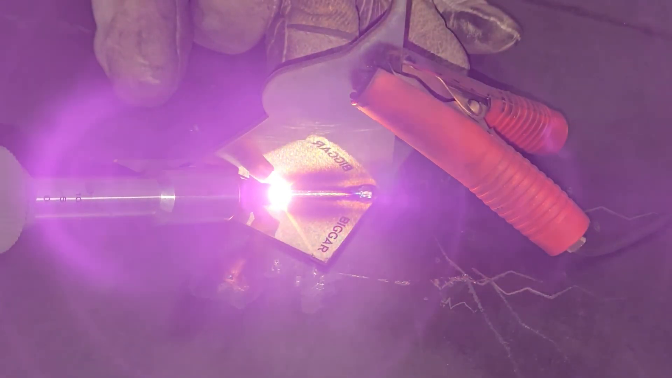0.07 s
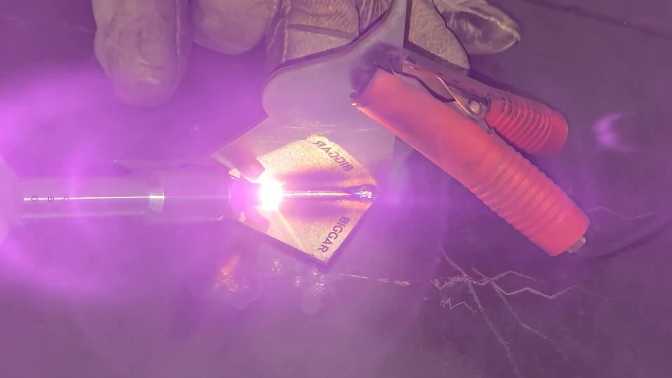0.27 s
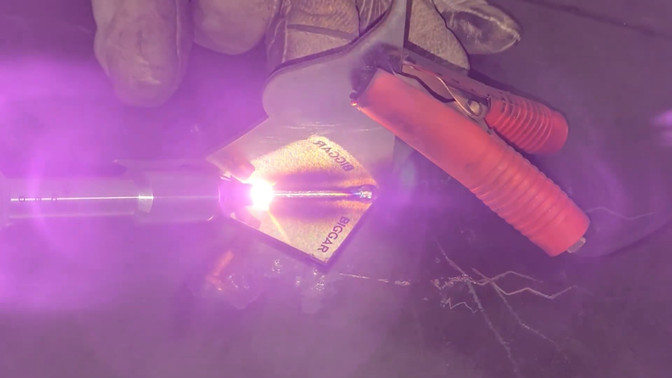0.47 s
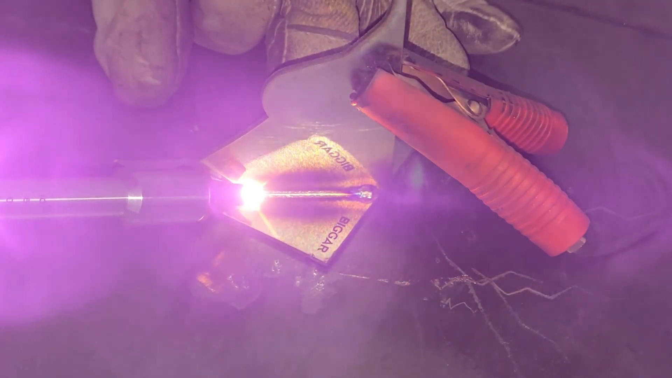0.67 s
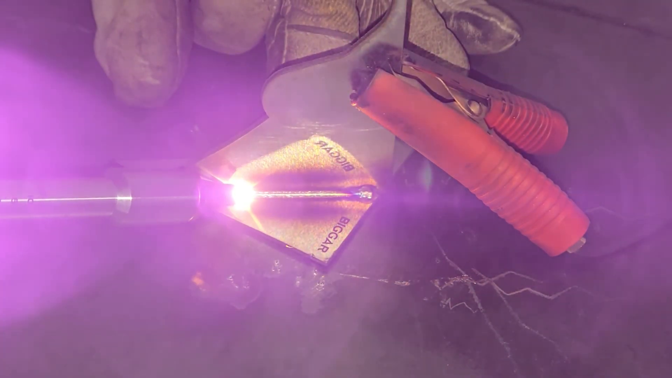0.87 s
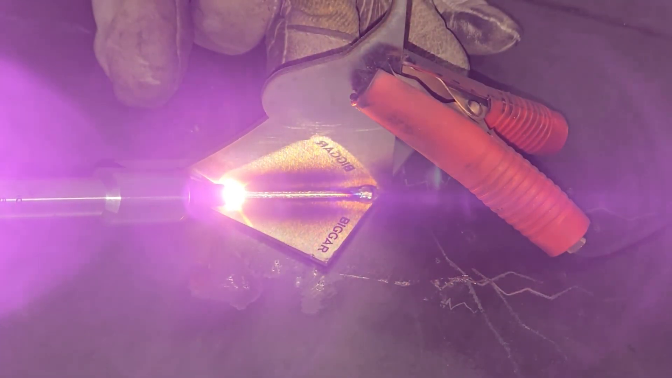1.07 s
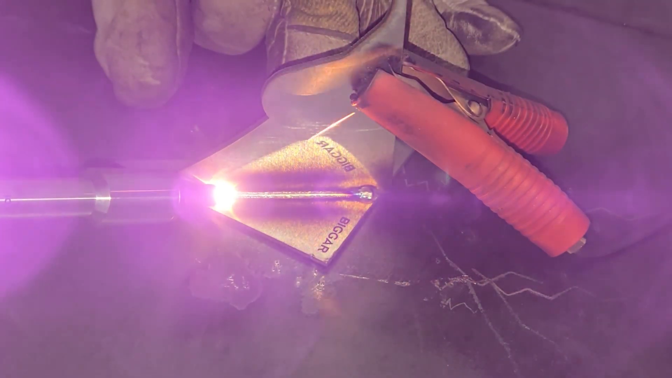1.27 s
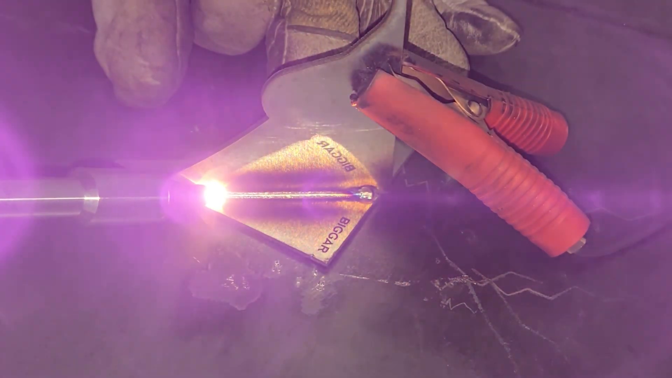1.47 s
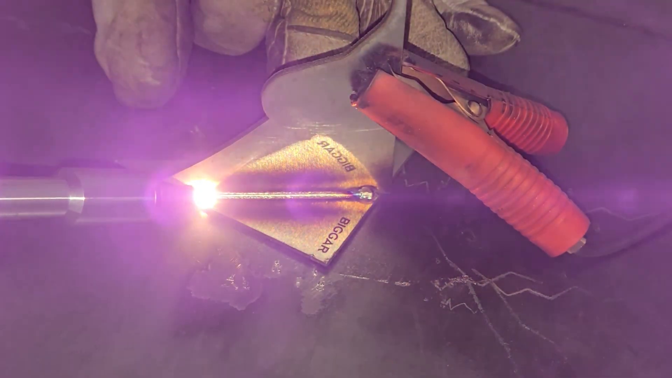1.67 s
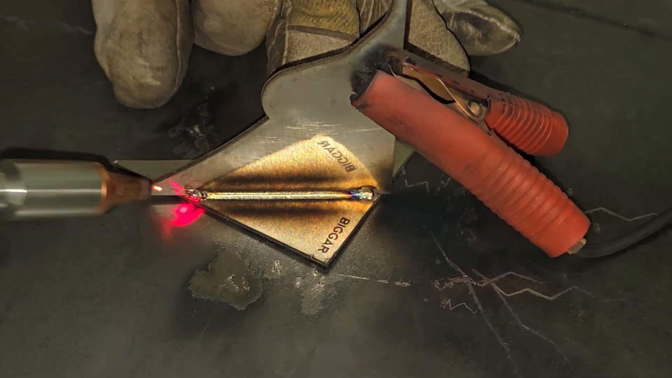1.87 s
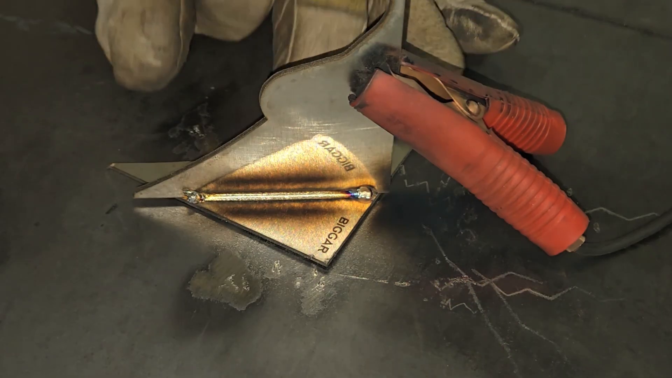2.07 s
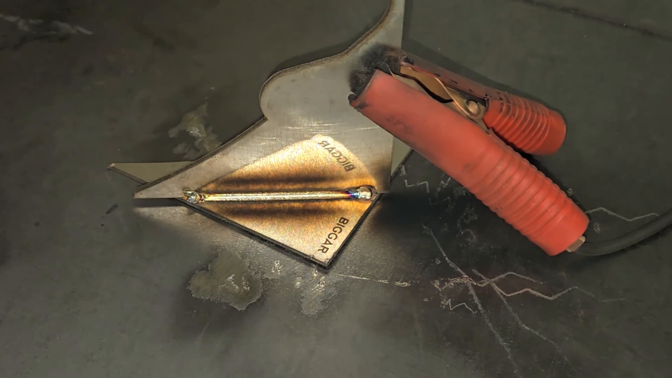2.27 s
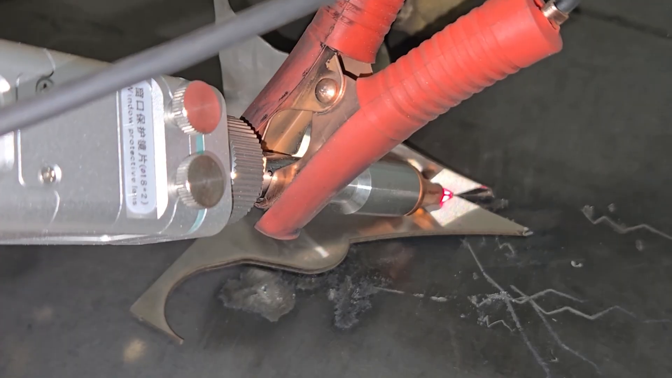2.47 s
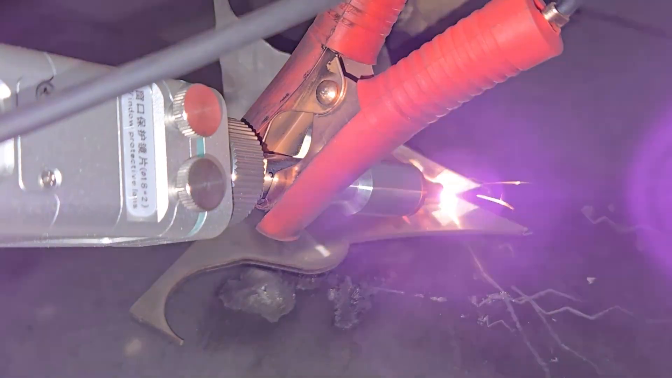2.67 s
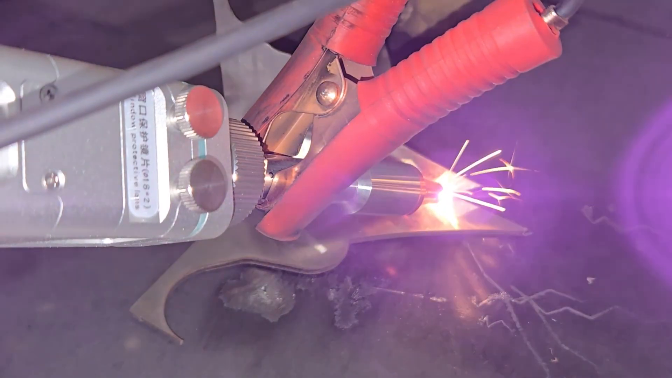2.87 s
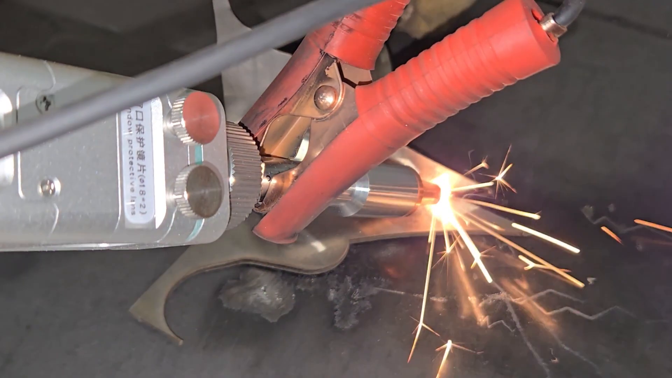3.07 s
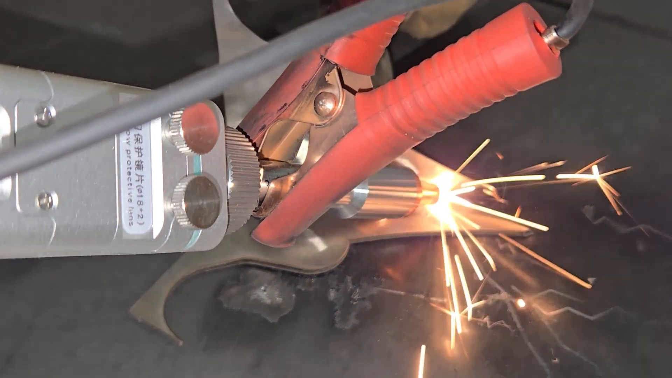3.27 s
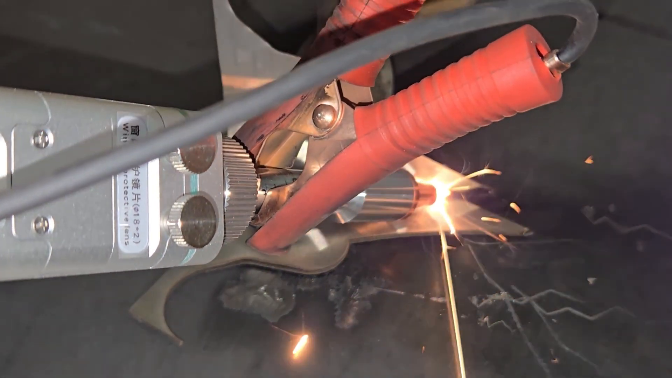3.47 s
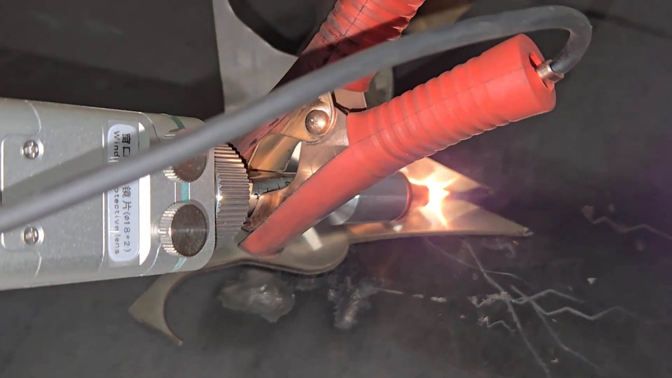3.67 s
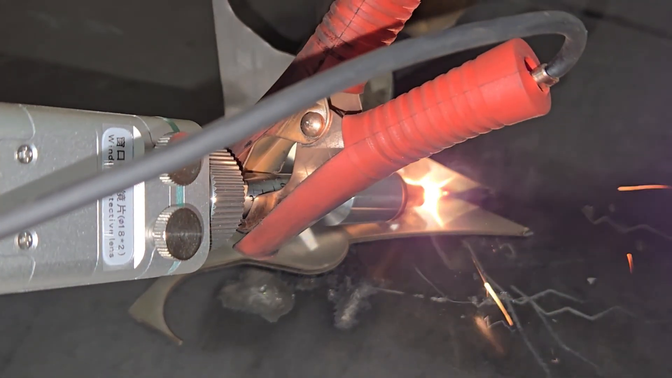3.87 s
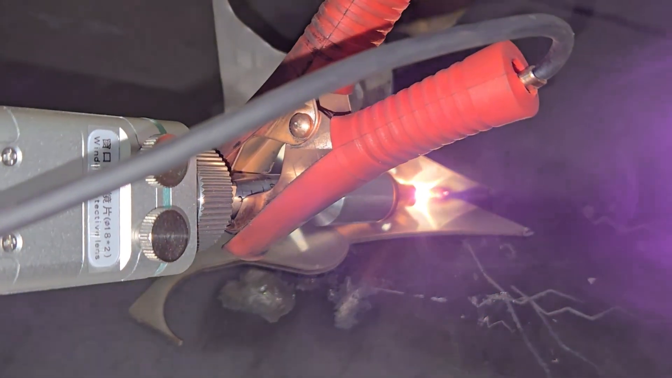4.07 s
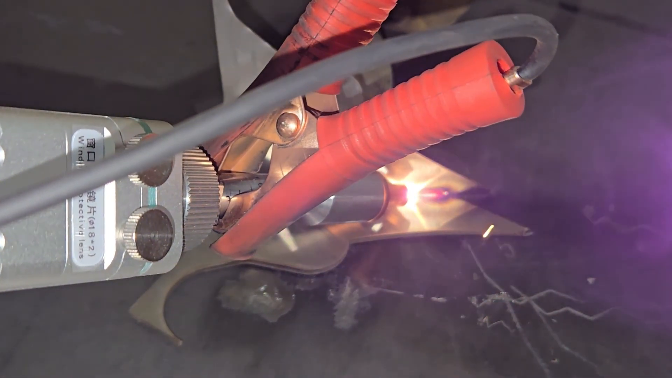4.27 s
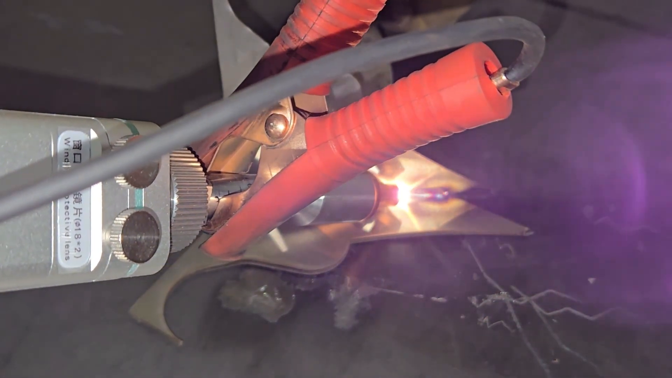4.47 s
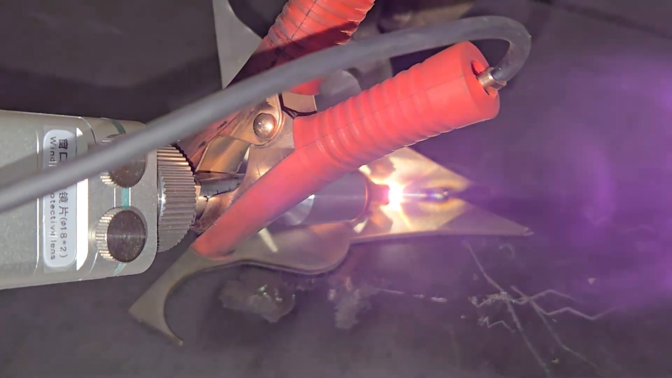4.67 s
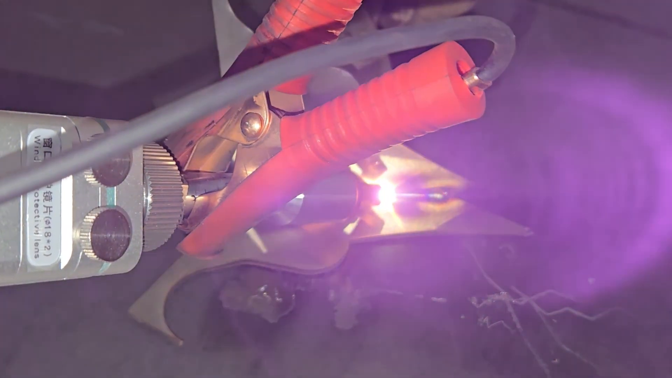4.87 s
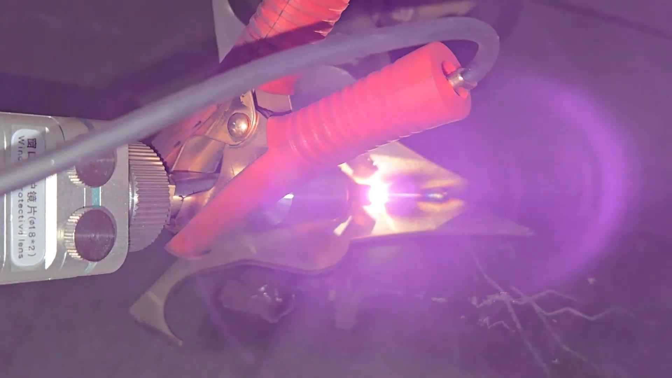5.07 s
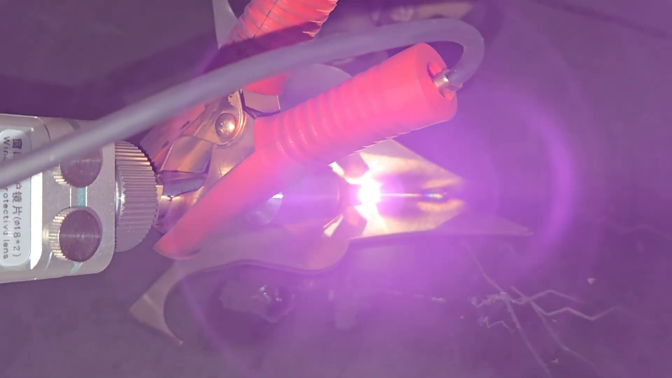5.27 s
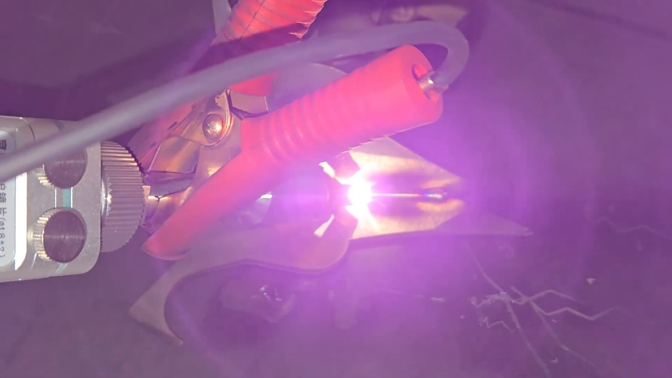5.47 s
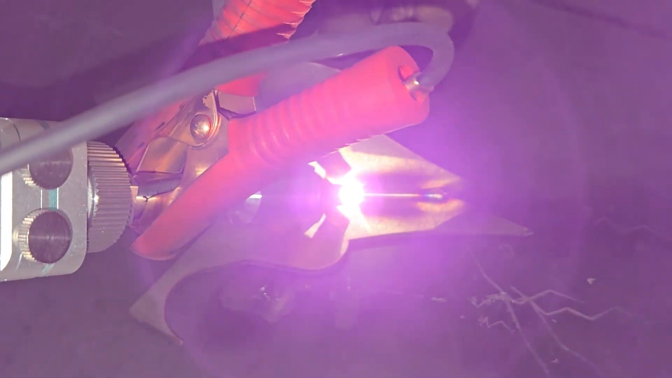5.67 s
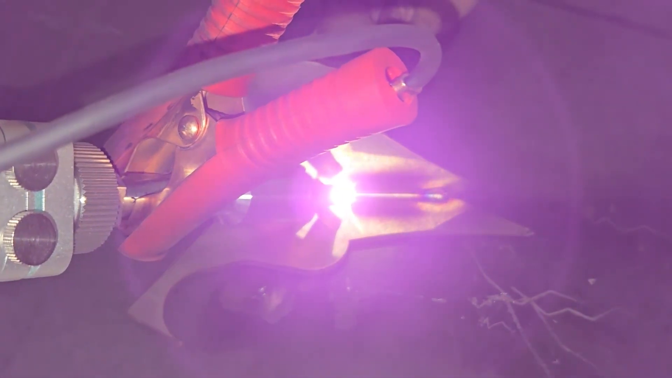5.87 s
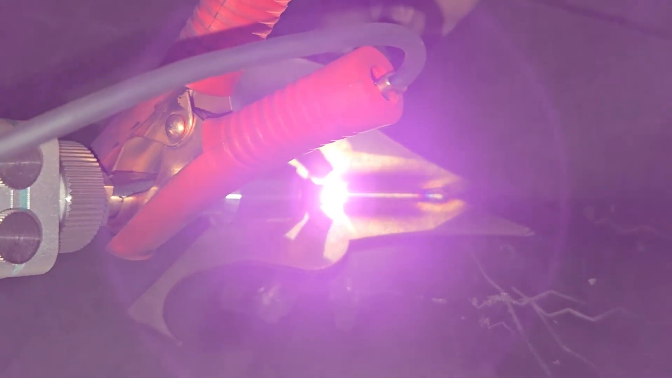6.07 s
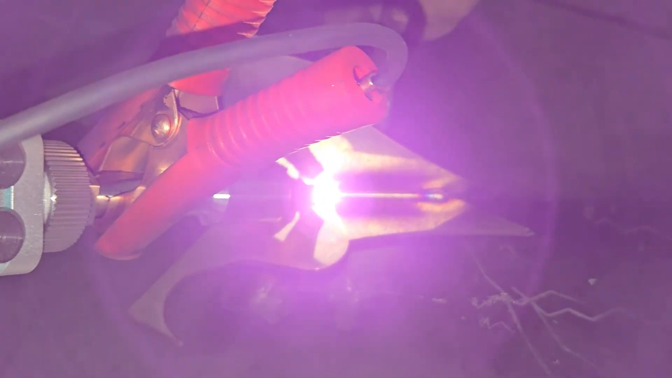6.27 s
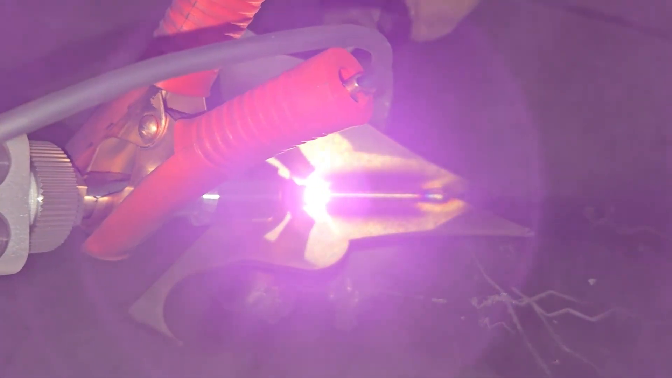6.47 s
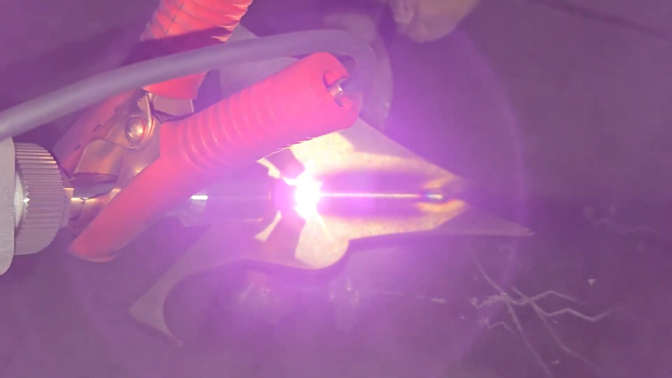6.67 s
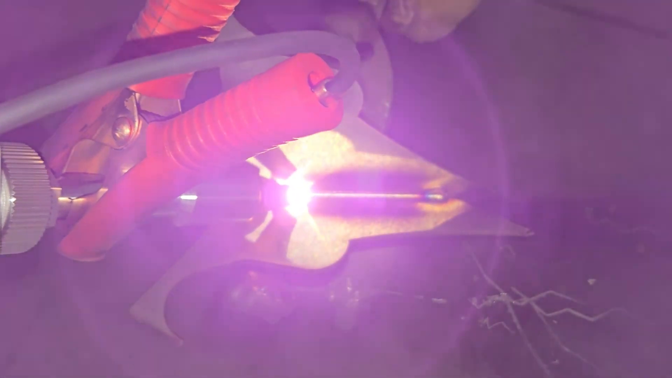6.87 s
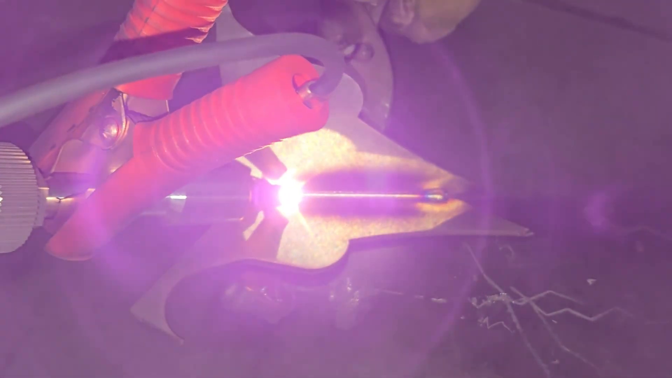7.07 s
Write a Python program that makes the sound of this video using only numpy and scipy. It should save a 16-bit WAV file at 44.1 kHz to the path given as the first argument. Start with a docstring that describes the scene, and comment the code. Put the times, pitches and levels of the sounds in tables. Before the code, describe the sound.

A laser welder's bright buzzing fizz stops, leaving faint fan noise and soft knocks, then gas hisses and it relights, jetting steadily before buzzing again.

```python
"""A handheld laser welder on a steel bench: the first seam fizzes, sputters and buzzes from the outset.
The beam wobbles 120 times a second; each sweep boils off vapour bursts. It boils harder at the thin tip, then stops.
In the pause a fan is heard, a motor hum dies, a glove rustles and the work knocks; a valve lets gas hiss through
the nozzle. The beam relights with a flare, pierces as a growing steady jet, then throbs and runs a second seam."""
import sys
import numpy as np
from scipy import signal
from scipy.fft import rfft, irfft, next_fast_len
from scipy.io import wavfile
from scipy.ndimage import uniform_filter1d

SR = 44100
rng = np.random.default_rng(int(sys.argv[2]) if len(sys.argv) > 2 else 0)


def output_pcm(signal):
    """Save a mono or channel-first signal as 16-bit PCM at the path in sys.argv[1].

    Samples are clipped to [-1, 1] before scaling.
    """
    pcm = np.clip(np.atleast_2d(signal).T, -1, 1) * 32767
    wavfile.write(sys.argv[1], SR, np.round(pcm).astype(np.int16))


N = 313551
TIME = np.arange(N) / SR
SIZE = next_fast_len(N + SR // 2, real=True) // 2 * 2
FREQS = np.maximum(np.arange(SIZE // 2 + 1) * SR / SIZE, 1)
WOBBLE_HZ = 120.005
VALVE_S = 2.622   # also parts the first weld's settings from the second's


def from_db(db):
    """Decibels to gain."""
    return 10 ** (np.asarray(db) / 20)


def rms_one(x):
    """Scale to unit rms."""
    return x / np.sqrt(np.mean(x ** 2) + 1e-20)


def in_time(rows):
    """One curve over time per column."""
    s, *columns = np.transpose(rows)
    return [np.interp(TIME, s, c) for c in columns]


def in_frequency(rows):
    """One gain curve per dB column, interpolated over log frequency."""
    hz, *columns = np.transpose(rows)
    return [from_db(np.interp(np.log(FREQS), np.log(hz), c)) for c in columns]


def between(start, end, edge=0.0014):
    """A gate, open from start to end, with straight ramps outside."""
    opening = np.clip((TIME - start) / edge + 1, 0, 1)
    closing = np.clip((end - TIME) / edge + 1, 0, 1)
    return opening * closing


def ramp(start, length):
    """A straight rise from 0 to 1."""
    return np.clip((TIME - start) / length, 0, 1)


def swell(s, length):
    """A bell of height 1."""
    return np.exp(-np.minimum(((TIME - s) / length) ** 2, 50))


def decay(start, tau):
    """Sudden start, exponential fall."""
    return (TIME >= start) * np.exp(-np.clip((TIME - start) / tau, 0, 50))


def drift(rate):
    """Random curve of rms 1, straight between `rate` knots a second."""
    knots = np.arange(N) * rate / SR
    return rms_one(np.interp(knots, np.arange(N // 8), rng.standard_normal(N // 8)))


def high_pass(hz, order=4):
    """Gain of a Butterworth high-pass."""
    return 1 / np.sqrt(1 + (hz / FREQS) ** (2 * order))


def low_pass(hz, order=4):
    """Gain of a Butterworth low-pass; far above the cut-off its fall stops at a floor near -400 dB."""
    ratio = np.minimum(FREQS / hz, 10 ** (20 / order))   # the limit stops overflow
    return 1 / np.sqrt(1 + ratio ** (2 * order))


def colour(x, gain):
    """Causal (minimum-phase) filter with the given gain curve."""
    cepstrum = irfft(np.log(gain + 1e-5 * gain.max()))
    cepstrum[1:SIZE // 2] *= 2
    cepstrum[SIZE // 2 + 1:] = 0
    return irfft(rfft(x, SIZE) * np.exp(rfft(cepstrum)))[..., :N]


def grains(spread_db, rate):
    """Noise whose strength wanders at random."""
    return rms_one(rng.standard_normal(N) * from_db(spread_db * np.clip(drift(rate), -2, 2)))


def sweeps(bursts, between_db, uneven_db, jitter):
    """Vapour jet strength: every sweep repeats the bursts, unequal in level and jittered (cycles)."""
    power = from_db(between_db) ** 2
    for start, length, db in bursts:
        cycle = WOBBLE_HZ * TIME - start + jitter * drift(60) + 2
        sweep_db = db + uneven_db * np.clip(rng.standard_normal(N // 100), -2, 2)
        strength = from_db(sweep_db)[cycle.astype(int)]
        power = power + (strength * np.exp(-(cycle % 1) / length)) ** 2
    return rms_one(np.sqrt(uniform_filter1d(power, size=5)))


# Vapour bursts in one sweep. Each row: start in cycles, decay in cycles, level in dB.
FIRST_BURSTS = [(.008, .055, 0), (.07, .06, -6), (.205, .08, -5), (.5, .04, -3), (.6, .11, -11),
                (.725, .11, -6.5)]
SECOND_BURSTS = [(.205, .038, .7), (.3, .08, -8), (.405, .11, -8), (.703, .038, -2), (.81, .09, -10.5),
                 (.94, .1, -6)]
# Slower slops of the melt in one sweep. Each row: start in cycles, decay in cycles, level in dB.
FIRST_SLOPS = [(.14, .1, 0), (.66, .18, -2)]
SECOND_SLOPS = [(.36, .14, 0), (.88, .18, 0)]
# Fizz colour. Each row: frequency in Hz, first seam in dB, piercing in dB, second seam in dB.
FIZZ_COLOUR = [(3000, -13.5, -20, -15.5), (3930, -12.5, -15.5, -12), (5090, -10, -17.5, -13.5),
               (6550, -6, -6, -4.5), (7500, -3.5, -6.5, -5.5), (8260, -3, -5, -3), (9430, 1.5, -5, -3),
               (10020, 6, 0, 2.5), (10500, -0.2, -2, -0.5), (12000, 2, -3.5, -1.5), (12800, 1.5, 4, 3.5),
               (13800, 2.5, -0.5, 0.5), (14940, 3.5, 3, 4), (15600, -2, -5, -6.5)]
# Sputter colour. Each row: frequency in Hz, first seam in dB, second seam in dB.
SPUTTER_COLOUR = [(60, -7, -26), (131, -10.5, -13), (219, -9.5, -3), (342, -4.5, -3), (544, 1.5, 2.5),
                  (905, -2, -1.5), (1150, 0, -0.5), (2140, -3, -1), (2500, -2.5, 1), (2930, -2.5, -2)]
LULL_DB, UNEVEN_DB, JITTER_CYCLES = -21, 1.3, .003
# share of the second weld's jet power that pulses only gently (0-1)
STEADY_PIERCING, STEADY_RUNNING = 0.97, 0.15


def weld():
    """Vapour bursts gate a bright fizz, melt slops a duller sputter; while piercing the jet hardly pulses."""
    first, second = lit()
    fizz_db, sputter_db = boiling()
    steady = np.clip(STEADY_RUNNING + (STEADY_PIERCING - STEADY_RUNNING) * piercing(), 0, 1)
    phase = 2 * np.pi * WOBBLE_HZ * TIME
    gentle_jet = from_db(2.0 * np.cos(2 * phase) + 1.3 * np.sin(phase) + 1.0 * drift(250))
    jets = [sweeps(FIRST_BURSTS, LULL_DB, UNEVEN_DB, JITTER_CYCLES),
            gentle_jet,
            sweeps(SECOND_BURSTS, LULL_DB, UNEVEN_DB, JITTER_CYCLES)]
    shares = [first, second * np.sqrt(steady), second * np.sqrt(1 - steady)]
    fizz = 0
    for share, jet, gain in zip(shares, jets, in_frequency(FIZZ_COLOUR)):
        hiss = jet * grains(spread_db=1.0, rate=4000)
        fizz = fizz + share * rms_one(colour(hiss, gain * high_pass(2820)))
    # two slops a sweep, at the turns of the beam
    slops = [sweeps(FIRST_SLOPS, between_db=-9.5, uneven_db=1.5, jitter=0.0098),
             sweeps(SECOND_SLOPS, between_db=1.5, uneven_db=3.5, jitter=0.014)]
    sputter = 0
    for gate, slop, gain in zip([first, second], slops, in_frequency(SPUTTER_COLOUR)):
        lumps = slop * grains(spread_db=2.5, rate=1500)
        sputter = sputter + gate * rms_one(colour(lumps, gain * low_pass(4030) * high_pass(96, order=3)))
    return from_db(fizz_db) * fizz + from_db(sputter_db) * sputter


# Beam lit, one row per weld. Each row: start in seconds, end in seconds.
WELDS = [(0, 1.903), (2.741, 8)]


def lit():
    """One gate per weld."""
    return [between(start, end) for start, end in WELDS]


# Base levels, one row per weld. Each row: fizz, sputter, 2nd harmonic, 4th harmonic, other harmonics, all in dB.
WELD_LEVELS = [(-24.5, -46.5, -62, -51.5, -45.5), (-25, -48, -62, -52, -48)]


def weld_levels():
    """Each layer's level in dB, first weld's until the valve opens, then the second's."""
    return [np.where(TIME < VALVE_S, first_db, second_db) for first_db, second_db in zip(*WELD_LEVELS)]


# Fizz is loudest where the melt passes under the microphone, one row per weld.
# Each row: time in seconds, length in seconds, loss far from there in dB.
PASSES = [(0.05, 0.98, 0.2), (6.112, 1.43, 4.5)]
PIERCE_DB, PIERCE_DB_PER_S = 5, 2.6   # the jet grows as the hole deepens
TIP_FIZZ_DB, TIP_SPUTTER_DB = 1, 5


def boiling(unrest_db=0.54, gust_db=1.28):
    """Fizz and sputter levels in dB: piercing trades sputter for fizz; tip raises both, surges shift them."""
    fizz_db, sputter_db = weld_levels()[:2] + surging() + unrest_db * drift(22)
    off_axis_db = sum(gate * loss_db * (1 - swell(s, length))
                      for gate, (s, length, loss_db) in zip(lit(), PASSES))
    jet_db = piercing() * (PIERCE_DB + PIERCE_DB_PER_S * (TIME - PIERCE_START_S))
    fizz_db = fizz_db - off_axis_db + jet_db + TIP_FIZZ_DB * tip()
    sputter_db = sputter_db - pool_loss(empty_db=5.5, refill_s=0.83)
    sputter_db = sputter_db + TIP_SPUTTER_DB * tip() + gust_db * drift(26)
    return fizz_db, sputter_db


# Flare as the beam lights. One row: time in seconds, length in seconds, fizz gain in dB, sputter gain in dB.
FLARE = (2.761, 0.012, 5.3, 13)
# The melt boils up. Each row: time in seconds, fizz gain in dB, sputter gain in dB.
SURGES = [(1.72, 0.5, 2), (3.53, 0.3, 4.5), (3.75, 1, 4), (4.18, -0.5, 4), (5.14, 0, 2.8), (5.73, 0.5, 2),
          (6.95, 1.5, 1.5)]
SURGE_S = 0.062


def surging():
    """Fizz and sputter gains in dB from the flare and from each time the melt boils up."""
    rows = [FLARE] + [(s, SURGE_S, *gains) for s, *gains in SURGES]
    return sum(np.outer(gains, swell(s, length)) for s, length, *gains in rows)


PIERCE_START_S, PIERCE_END_S, PIERCE_EDGE_S = 3.037, 3.97, 0.062


def piercing():
    """1 while the beam bores in place."""
    return between(PIERCE_START_S, PIERCE_END_S, edge=PIERCE_EDGE_S)


POOL_LACK_AT_START, REFILL_START_S = 0.31, 3.64   # lack as a share, 0-1


def pool_loss(empty_db, refill_s):
    """Loss in dB while the second pool lacks melt: short at first, blown empty by piercing, then refilled."""
    blown_out = ramp(PIERCE_START_S - PIERCE_EDGE_S / 2, PIERCE_EDGE_S)
    lack = (TIME > VALVE_S) * (POOL_LACK_AT_START + (1 - POOL_LACK_AT_START) * blown_out)
    return empty_db * lack * np.exp(-np.maximum(TIME - REFILL_START_S, 0) / refill_s)


TIP_S, TIP_RISE_S = 1.515, 0.39


def tip():
    """Rises from 0 to 1 as the first seam runs out onto the thin tip of the work."""
    return ramp(TIP_S, TIP_RISE_S) * (TIME < VALVE_S)


def spray(coarse_db=-41, lowest_hz=2300, top_hz=6000, fine_db=-29, fine_hz=12800):
    """At the thin tip the gas tears a spray off the melt: coarse drops and a fine sizzle."""
    coarse_gain = high_pass(lowest_hz, order=2) * low_pass(top_hz, order=2)
    coarse = rms_one(colour(grains(spread_db=4.0, rate=1500), coarse_gain))
    fine = rms_one(colour(grains(spread_db=3.0, rate=1500), high_pass(fine_hz, order=10)))
    return tip() ** 3 * lit()[0] * (from_db(coarse_db) * coarse + from_db(fine_db) * fine)


# Wobble harmonics besides the 2nd and 4th.
# Each row: multiple, first seam in dB, second seam in dB, end of second seam in dB.
HARMONICS = [(3, -15, -22, -13), (5, -10, -16, -11.5), (6, -16.5, -16.5, -21), (7, -18, -16.5, -11),
             (8, -9.5, -8.5, -13), (9, -13, -11, -13), (10, -10.5, -12, -17), (11, -11, -14.5, -10),
             (13, -11, -10.5, -6.5), (14, -25, -9, -16), (15, -14, -11.5, -21), (16, -27, -21, -9),
             (17, -13.5, -14, -26), (18, -13.5, -20, -26), (20, -17.5, -21, -17), (21, -15, -15.5, -24)]
SEAM_END_S = 6.54   # the buzz changes colour from here


def buzz(scatter=0.96, rough_db=2.5, waver=0.34, sway_db=0.9):
    """The plume swells in step with the wobble and radiates its harmonics; scatter and waver in radians."""
    second_db, fourth_db, others_db = throbbing()
    phase = 2 * np.pi * WOBBLE_HZ * TIME
    first, second = lit()
    late = ramp(SEAM_END_S, 0.1)
    upper = 0
    for multiple, first_db, second_seam_db, late_db in HARMONICS:
        second_gain = (1 - late) * from_db(second_seam_db) + late * from_db(late_db)
        gain = first * from_db(first_db) + second * second_gain
        offset = scatter * rng.standard_normal() + waver * drift(7.3)
        upper = upper + gain * from_db(sway_db * drift(12)) * np.cos(multiple * (phase - 1.0) + offset)
    low = from_db(second_db + 0.85 * drift(16)) * np.sin(2 * phase)
    low = low + from_db(fourth_db + 0.7 * drift(9)) * np.sin(4 * phase)
    return np.sqrt(2) * (from_db(others_db + rough_db * drift(200)) * upper + (first + second) * low)


# the fresh pool throbs at the 2nd harmonic, then settles
THROB_S, THROB_RISE_S, THROB_DB, THROB_SAG_DB_PER_S = 4.07, 0.17, 9, 4
TIP_THROB_DB = 6.5


def throbbing(surge_share=0.52):
    """Levels of the 2nd, 4th and other harmonics in dB; they need melt and swell as it boils up."""
    second_db, fourth_db, others_db = np.array(weld_levels()[2:]) + surge_share * surging()[1]
    sagging_db = THROB_DB - THROB_SAG_DB_PER_S * (TIME - THROB_S)
    fresh_db = ramp(THROB_S - THROB_RISE_S, THROB_RISE_S) * sagging_db
    pierce_loss_db = piercing() * pool_loss(empty_db=9.5, refill_s=0.2)
    return (second_db + fresh_db + TIP_THROB_DB * tip() - pierce_loss_db,
            fourth_db - pool_loss(empty_db=9.5, refill_s=0.079),
            others_db - pool_loss(empty_db=25.0, refill_s=0.33))


def flutter(below_throb_db=-9, lowest_hz=140, top_hz=340, lumpy_db=4.0):
    """The unsteady plume adds low noise, different at each port, that follows the 2nd harmonic's level."""
    band = high_pass(lowest_hz, order=4) * low_pass(top_hz, order=3)
    rumble = rms_one(colour(rng.standard_normal((2, N)), band))
    return from_db(throbbing()[0] + below_throb_db + lumpy_db * drift(30)) * sum(lit()) * rumble


# Spatter leaving the melt. Each row: time in seconds, peak level in dB.
SPITS = [(0.581, -30), (.6562, -30), (1.0976, -32), (1.2232, -27), (1.2729, -28.5), (1.3562, -29),
         (1.5644, -27), (1.5726, -24.5), (1.6727, -26), (1.7307, -29), (1.739, -29), (1.9012, -26),
         (2.7692, -30), (5.6826, -30), (5.8239, -31), (6.1326, -30), (6.7407, -33), (7.0152, -26.5)]
# Point of the sweep where droplets fly off: first seam in cycles, second seam in cycles.
SPIT_TURNS = [.73, .92]


def spits(small_db=-38, per_sweep=.2, spread_db=2):
    """Droplets leave with a dull tick; random sweeps throw small ones, fainter while the pool lacks melt."""
    spread = spread_db * np.clip(rng.standard_normal(N), -2, 2)
    small = from_db(small_db - pool_loss(empty_db=18, refill_s=0.44) + spread)
    turns = sum(gate * (np.diff((WOBBLE_HZ * TIME - turn) % 1, prepend=0) < 0)
                for gate, turn in zip(lit(), SPIT_TURNS))
    clicks = -small * turns * (rng.random(N) < per_sweep)
    for s, db in SPITS:
        clicks[round(s * SR)] = -from_db(db)
    ticks = colour(clicks, high_pass(293, order=2) * low_pass(1160, order=2))
    return ticks * np.abs(clicks).max() / np.abs(ticks).max()


# Nozzle resonances. Each row: frequency in Hz, width in Hz, level in dB.
NOZZLE = [(895, 380, -4), (2560, 180, 2), (4630, 92, 2.5), (7950, 290, 1.5), (10260, 450, 4),
          (11300, 410, -8), (14450, 550, -8), (15400, 500, -12)]
VALVE_DB, PUFF_S, PUFF_DB, PUFF_HZ = -45, 2.6341, -21, 776   # puff level before its high-pass
# a full rush, masked and dying once the beam is lit
GAS_DB, GAS_RISE_S, GAS_FALL_S, GAS_LIT_DB, GAS_END_S = -36, 0.023, 0.03, -15, 3.05


def gas(rough_db=1.8):
    """The valve ticks, a pressure puff leaves the nozzle, then the flow sounds its pipe resonances."""
    pipe_power = sum(from_db(db) ** 2 / (1 + ((FREQS - hz) / width) ** 2) ** 2 for hz, width, db in NOZZLE)
    leak = from_db(-13.5) * low_pass(10000, order=12)
    flow_gain = np.sqrt(pipe_power + leak ** 2) * high_pass(420, order=2)
    flow = rms_one(colour(rng.standard_normal(N), flow_gain))
    rush = np.exp(-np.maximum(TIME - WELDS[1][0], 0) / GAS_FALL_S)
    flow *= from_db(GAS_DB + rough_db * drift(140)) * ramp(VALVE_S, GAS_RISE_S) ** 2
    flow *= np.maximum(rush, from_db(GAS_LIT_DB)) * between(0, GAS_END_S)
    tick_gain = (high_pass(8500, order=4) + from_db(-9) * low_pass(1500, order=1)) * low_pass(11500)
    tick = rms_one(colour(rng.standard_normal(N), tick_gain))
    tick *= from_db(VALVE_DB) * decay(VALVE_S, 0.007)
    puff = -from_db(PUFF_DB) * np.sin(2 * np.pi * PUFF_HZ * (TIME - PUFF_S)) * swell(PUFF_S, 0.00066)
    return flow + tick + colour(puff, high_pass(230, order=2))


# Glove on steel. Each row: time in seconds, length in seconds, level in dB.
RUSTLES = [(2.163, 0.016, -59), (2.227, 0.02, -57), (2.375, 0.031, -63.5)]
# Rustle colour. Each row: frequency in Hz, level in dB.
RUSTLE_COLOUR = [(1000, 10), (1650, 2), (2900, -7), (4300, -1), (10000, -2), (15000, 0.5)]
# Work shifting on the bench. Each row: time in seconds, level in dB, frequency in Hz.
KNOCKS = [(2.078, -52, 640), (2.159, -46, 680), (2.196, -50, 533), (2.223, -49, 530), (2.238, -48, 583)]


def handling(ring_hz=1650, ring_db=-15):
    """A glove brushes the steel as bells of noise; the work knocks softly as decaying tones."""
    strokes = sum(from_db(db) * np.exp(-.5 * np.minimum(((TIME - s) / length) ** 2, 100))
                  for s, length, db in RUSTLES)
    brush_gain = in_frequency(RUSTLE_COLOUR)[0] * high_pass(770)
    brush = rms_one(colour(grains(spread_db=3.0, rate=520), brush_gain))
    knocks = 0
    for s, db, hz in KNOCKS:
        tone = np.sin(2 * np.pi * hz * (TIME - s))
        ring = from_db(ring_db) * np.sin(2 * np.pi * ring_hz * (TIME - s))
        knocks = knocks + from_db(db) * decay(s, 0.0088) * (tone + ring)
    return strokes * brush + knocks


# Fan colour. Each row: frequency in Hz, level in dB.
FAN_COLOUR = [(25, -15), (60, -22), (110, -28), (220, -2.5), (420, -2), (560, 0), (700, 4), (860, -5),
              (1280, -13), (1900, -9), (3100, -18.5), (3700, -20.5), (6100, -18.5), (6900, -21),
              (8100, -21), (15500, -29)]
FAN_DB = -59
# Motor that cuts out in the pause. Each row: frequency in Hz, level in dB, start of fade in seconds.
MOTOR = [(103.5, -71.5, 2.42), (205, -69.5, 2.385)]
MOTOR_FADE_S = .045


def workshop(side_db=-3, waver_db=2.2):
    """Wide fan noise, and a wavering motor hum that dies away, its overtone first."""
    common, side = rng.standard_normal((2, N))
    wide = common + from_db(side_db) * side * [[1], [-1]]
    fan = rms_one(colour(wide, in_frequency(FAN_COLOUR)[0]))
    motor = 0
    for hz, db, off_s in MOTOR:
        fade = np.exp(-np.maximum(TIME - off_s, 0) / MOTOR_FADE_S)
        motor = motor + from_db(db + waver_db * drift(9.8)) * np.sin(2 * np.pi * hz * TIME) * fade
    return from_db(FAN_DB) * fan + np.sqrt(2) * motor


DRAUGHT_DB = -71


def draught(left_db=-10, top_hz=170, gust_db=10.0):
    """Moving air flutters faintly on each port, mostly the right one."""
    band = high_pass(113, order=2) * low_pass(top_hz, order=2)
    rumble = rms_one(colour(rng.standard_normal((2, N)), band))
    return from_db(DRAUGHT_DB + gust_db * np.clip(drift(28), -2, 1)) * rumble * from_db([[left_db], [0]])


# Torch position. Each row: time in seconds, left minus right in dB, lead at the left port in ms.
PLACE = [(0, 3.2, .042), (1.9, 3.2, .042), (2.7, 2.2, .004), (4.5, 2.0, .003), (5.5, 2.2, .015),
         (7.1, 2.8, .034)]
# Extra shading between the ports. Each row: frequency in Hz, left minus right in dB in first seam, in second.
SHADING = [(199, -12, -7.5), (483, -1, -2), (1390, -0.5, -0.6), (4130, 4, 0), (5230, 8, 4.5),
           (6550, 6, 9.5), (7540, 8, 13), (8600, -1, -1), (9300, 7, 2.5), (10200, 3, 3.5), (10700, 9, 0.5),
           (12900, 7.5, 9.5), (15000, -5, -7.5)]
# Fixed narrow dips at the right port. Each row: frequency in Hz, level in dB.
NOTCHES = [(3320, -7), (4870, -10)]
NOTCH_WIDTH_HZ = 94
# First reflections. Each row: delay in ms at each of the four seam times, strength as gain before a high-pass.
LEFT_ECHOES = [(1.61, 1.656, 1.555, 1.644, .12)]
RIGHT_ECHOES = [(1.348, 1.36, 1.337, 1.373, .22), (.7, .7, .721, .727, .16)]


def to_ears(x):
    """The torch is nearer the left of two microphone ports and the right one lies in shadow."""
    pan_db, lead_ms = in_time(PLACE)
    left, right = reflected(x, LEFT_ECHOES, 0), reflected(x, RIGHT_ECHOES, lead_ms)
    notch_db = sum(db / (1 + ((FREQS - hz) / NOTCH_WIDTH_HZ) ** 2) for hz, db in NOTCHES)
    right = colour(right, from_db(notch_db))
    panned = np.array([left * from_db(pan_db / 2), right * from_db(-pan_db / 2)])
    spectra = rfft(shadowed(panned), SIZE)
    seams = []
    for shade in np.sqrt(in_frequency(SHADING)):   # half the difference goes to each port
        tilt = shade * from_db(pan_db.mean() / 2)
        even_power = np.sqrt(2 / (tilt ** 2 + tilt ** -2))
        seams.append(irfft(spectra * even_power * np.array([shade, 1 / shade]))[:, :N])
    return np.where(TIME < VALVE_S, *seams)


def delayed(x, lags_ms):
    """One copy of the sound for each gliding delay."""
    fine = signal.resample_poly(x, 4, 1)
    return [np.interp((TIME - ms / 1000) * 4 * SR, np.arange(len(fine)), fine) for ms in lags_ms]


# Seam times: start of first, end of first, start of second, end of second, all in seconds.
SEAM_TIMES_S = [0, 1.9, 2.74, 7.11]


def reflected(x, echoes, lag_ms):
    """The direct sound and its first reflections, whose paths change as the torch travels."""
    lags_ms = [lag_ms + np.interp(TIME, SEAM_TIMES_S, row[:-1]) for row in echoes]
    direct, *copies = delayed(x, [lag_ms] + lags_ms)
    bounced = sum(row[-1] * copy for row, copy in zip(echoes, copies))
    bass = signal.lfilter(*signal.butter(1, 600, fs=SR), bounced)
    return direct + bounced - bass


# Sliding changes in the hiss, mostly dips.
# Each row: start in seconds, end in seconds, from Hz, to Hz, left in dB, right in dB.
SHADOWS = [(0.3, 1.8, 15500, 13700, -19, -3), (0.7, 2.6, 10200, 9950, -5, -5.5),
           (2.9, 9.2, 12200, 11700, 1, -8), (2.9, 5.3, 10470, 10550, -10, -9),
           (2.9, 5.3, 7460, 7540, 1.5, -15)]
SHADOW_WIDTH_HZ, SHADOW_FADE_S = 225, 0.47   # width to one side


def shadowed(pair):
    """Narrow dips slide through the hiss as torch and clamp move past the ports."""
    for start, end, from_hz, to_hz, *port_db in SHADOWS:
        centre_hz = np.interp(TIME, [start, end], [from_hz, to_hz])
        turn = np.exp(2j * np.pi * np.cumsum(centre_hz) / SR)
        # shift the band to 0 Hz, low-pass it, shift it back
        band = 2 * np.real(turn * signal.lfilter(*signal.butter(1, SHADOW_WIDTH_HZ, fs=SR), pair / turn))
        pair = pair - band * np.outer(1 - from_db(port_db), between(start, end, edge=SHADOW_FADE_S))
    return pair


SCATTER_DB, SCATTER_T60_S = -9.5, 0.023   # level before the high-pass


def bench(x, lowest_hz=1500, right_db=-1, count=20):
    """Clamp, torch and bench scatter short waves; echo patterns crossfade steadily as the torch moves."""
    t = TIME[:SR // 20]
    echoes = rng.standard_normal((count, 2, len(t))) * from_db(-60 * t / SCATTER_T60_S) * (t > .001)
    echoes /= np.sqrt(np.sum(echoes ** 2, axis=2, keepdims=True))
    echoes = signal.sosfilt(signal.butter(2, lowest_hz, "high", fs=SR, output="sos"), echoes)
    place = np.linspace(0, count - 1, N)
    scattered = 0
    for k, pattern in enumerate(echoes):
        share = np.sqrt(np.maximum(1 - abs(place - k), 0))
        scattered = scattered + signal.oaconvolve(x[None] * share, pattern, axes=1)[:, :N]
    return from_db(SCATTER_DB) * scattered * from_db([[0], [right_db]])


ROOM_T60_S, ROOM_DB = 0.2, -11.5


def room(x, treble_t60_s=0.1, split_hz=5500, boom_gain=from_db(12) / 2, boom_hz=300):
    """A short diffuse tail with a boomy bass; its treble dies first."""
    t = TIME[:SR // 2]
    noise = rng.standard_normal((2, len(t)))
    dull = signal.sosfilt(signal.butter(2, split_hz, fs=SR, output="sos"), noise)
    boom = signal.sosfilt(signal.butter(4, boom_hz, fs=SR, output="sos"), rng.standard_normal(noise.shape))
    dull += boom_gain * boom
    bright = signal.sosfilt(signal.butter(2, split_hz, "high", fs=SR, output="sos"), noise)
    tail = dull * from_db(-60 * t / ROOM_T60_S) - 0.3 * bright * from_db(-60 * t / treble_t60_s)
    tail *= t > .003
    tail /= np.sqrt(np.sum(tail ** 2, axis=1, keepdims=True))
    return from_db(ROOM_DB) * signal.fftconvolve(x[None], tail, axes=1)[:, :N]


DANCE_DB = -16.5


def scene():
    """All that happens at the torch, heard close up in the workshop."""
    melt = weld() + spray()
    noises = melt + spits() + gas() + handling()
    # the plume dances about, so its sound flickers between the ports
    dance = from_db(DANCE_DB) * melt * drift(440) * [[1], [-1]]
    direct = to_ears(noises + buzz()) + dance
    return direct + bench(noises) + room(noises) + flutter() + workshop() + draught()


CEILING, CUTOFF_HZ = .62, 15750   # ceiling as amplitude


def record(dry):
    """Peaks are rounded towards a ceiling and the top is cut steeply."""
    rounded = dry / (1 + (dry / CEILING) ** 4) ** (1 / 4)
    return irfft(rfft(rounded, SIZE) * low_pass(CUTOFF_HZ, order=200))[:, :N]


dry = scene()
out = record(dry)
output_pcm(out)
```